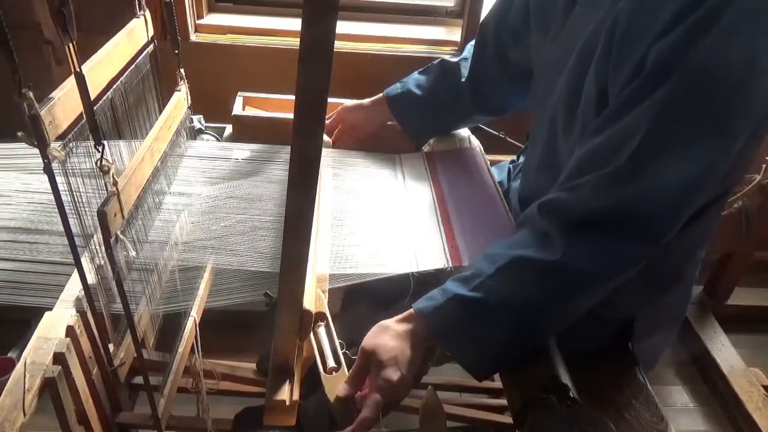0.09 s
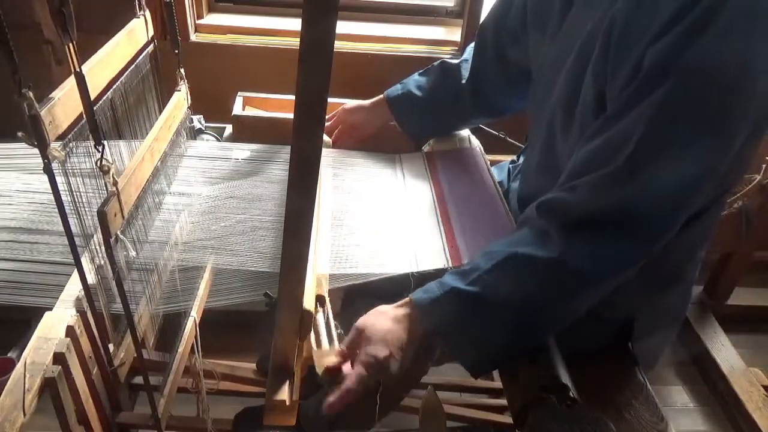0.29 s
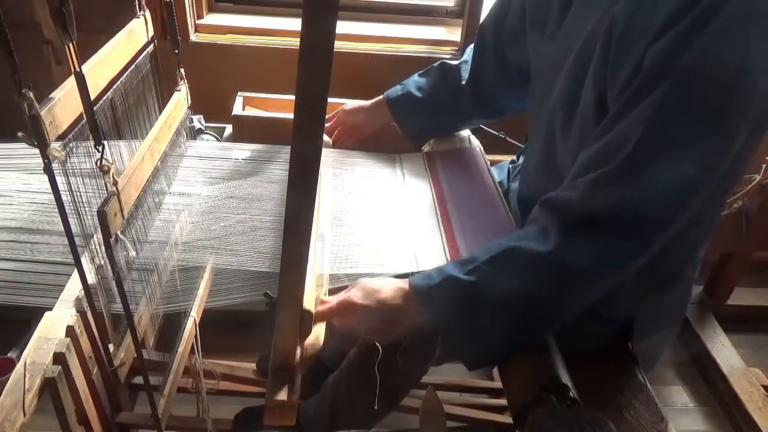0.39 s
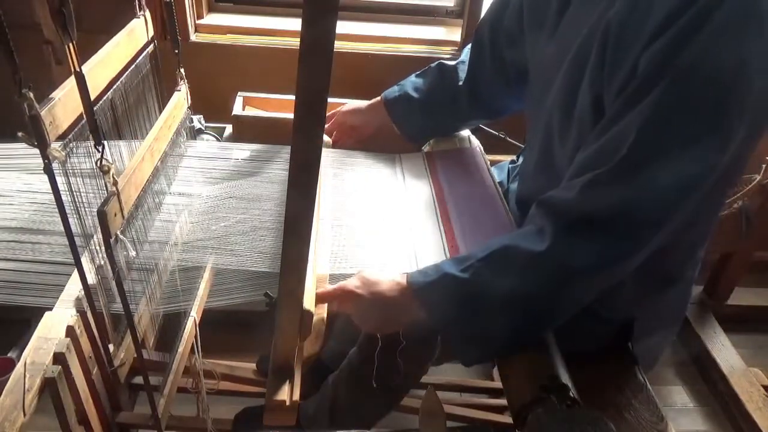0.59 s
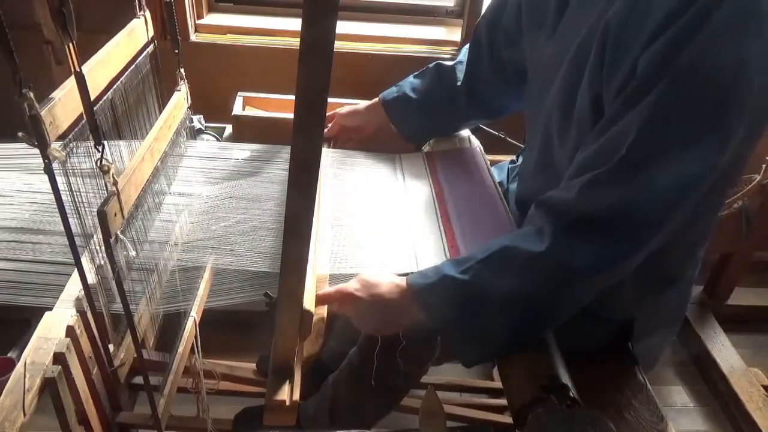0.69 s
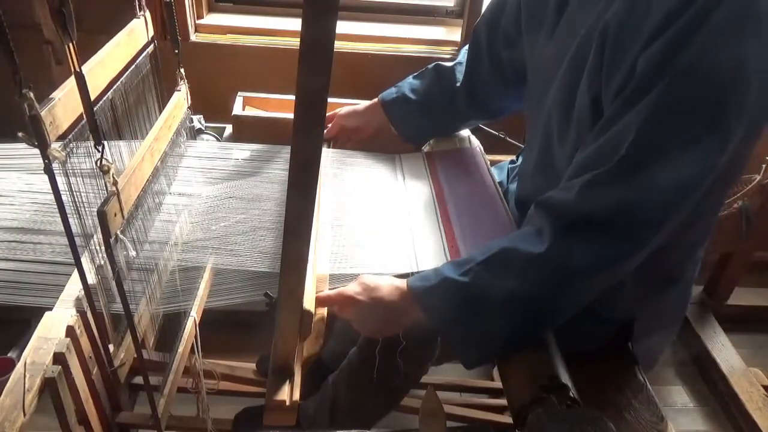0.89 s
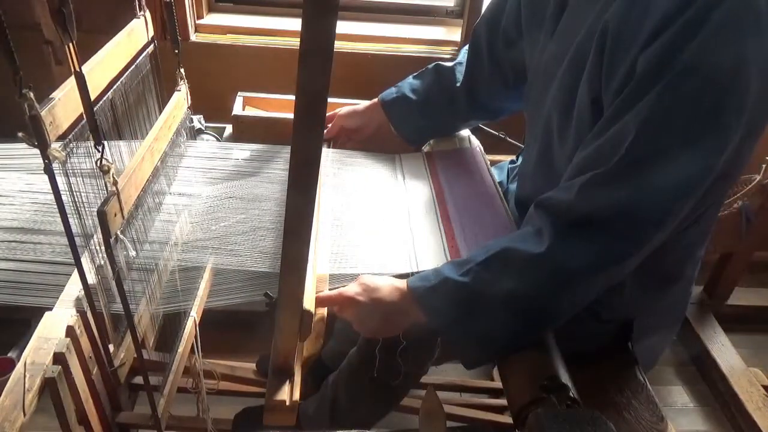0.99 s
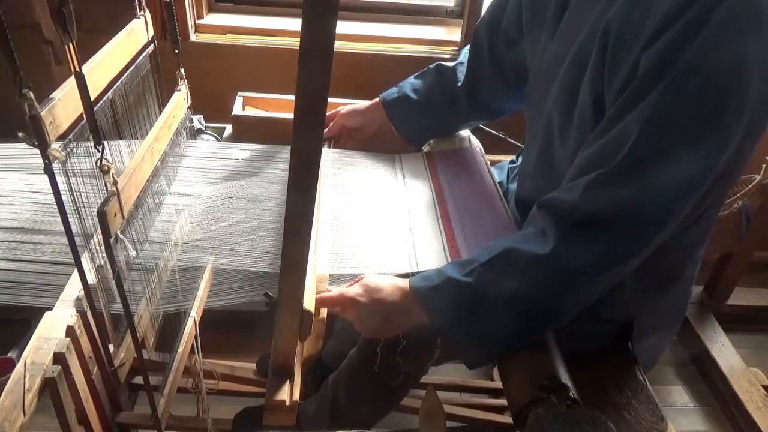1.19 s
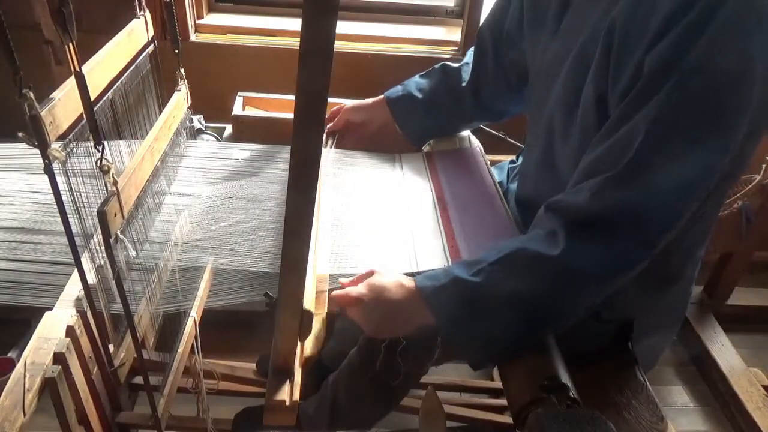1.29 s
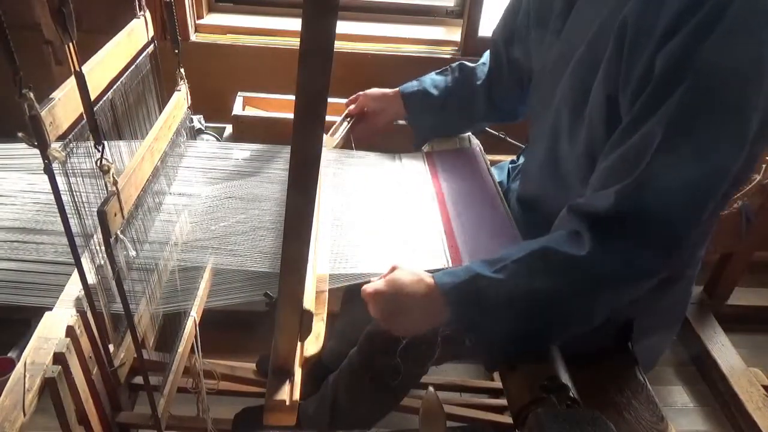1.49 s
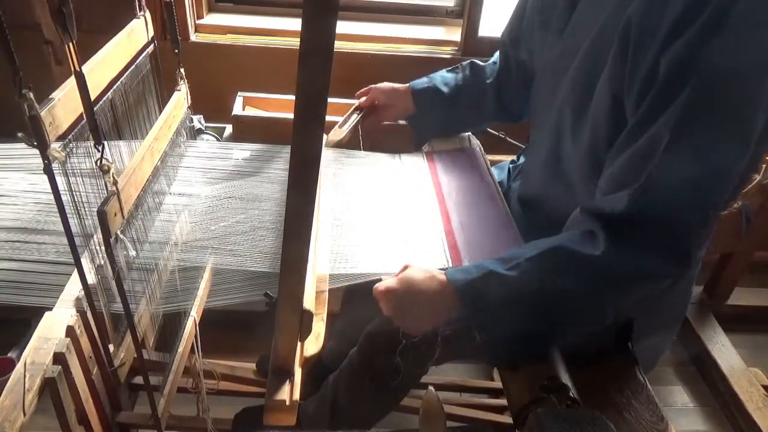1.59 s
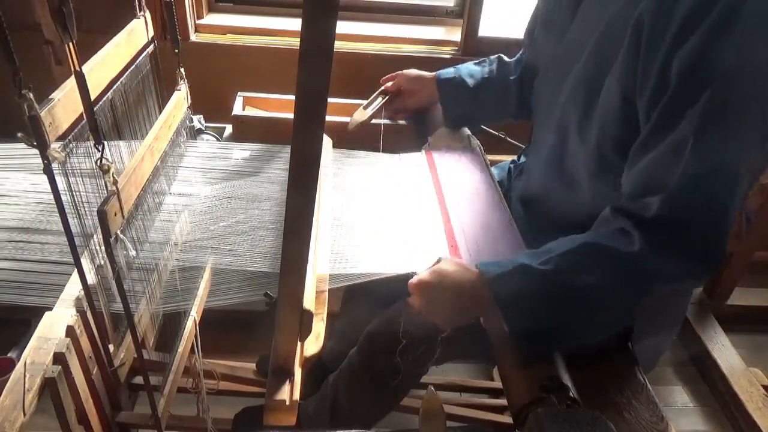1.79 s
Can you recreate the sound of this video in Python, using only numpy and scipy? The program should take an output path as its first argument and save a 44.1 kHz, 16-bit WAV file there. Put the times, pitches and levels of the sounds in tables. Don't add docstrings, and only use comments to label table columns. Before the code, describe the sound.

A wooden handloom changes shed with a bright clattering burst of wire clicks and frame knocks.

```python
import sys
import numpy as np
from scipy import signal
from scipy.fft import rfft, irfft, next_fast_len
from scipy.io import wavfile
from scipy.ndimage import uniform_filter1d, map_coordinates

SR = 44100
rng = np.random.default_rng(int(sys.argv[2]) if len(sys.argv) > 2 else 0)


def elevation(decibels):
    levels = np.asarray(decibels, float)
    return 10 ** (levels / 20)


def unload_audio(sound):
    columns = np.transpose(np.atleast_2d(sound))
    steps = np.round(np.clip(columns, -1, 1) * 32767)
    wavfile.write(sys.argv[1], SR, steps.astype(np.int16))


N = 79380

# f/Hz, density/dB
HEDDLES = [(410, -36), (700, -6), (1050, -5), (1280, -11.5), (2170, -6.5), (2620, -1.5), (5090, -2.5),
           (8030, -5), (11400, -14), (14800, -44), (22000, -120)]
# f/Hz, width/Hz, level/dB
WIRES = [(2960, 53, -2), (3260, 14, -14), (3820, 51, -25), (4660, 210, -6.5), (5740, 57, -2),
         (6620, 270, -10), (7500, 60, -33)]
WIRE_DB = -11.5
# t/s, gain/dB
GAIN = [(0, -1), (.7, -8), (.95, -7.5), (1.1, -4), (1.13, 6.5), (1.6, 5), (1.8, 5)]


def unit(x):
    return x / np.sqrt(np.mean(x ** 2) + 1e-20)


def along(points, hz):
    f, v = np.transpose(points)
    return np.interp(np.log(hz + 1), np.log(f + 1), v)


def curve(rows):
    t, db = np.transpose(rows)
    return np.interp(np.arange(N) / SR, t, db, left=-120, right=-120)


def wobble(rate):
    return map_coordinates(rng.standard_normal(300), [np.arange(N) * rate / SR])


def filtered(x, response):
    m = next_fast_len(N + SR // 2)
    return irfft(rfft(x, m) * response(np.fft.rfftfreq(m, 1 / SR)), m)[..., :N]


def body(peaks, widen=1):
    def response(f):
        total = 0
        for k, (centre, width, db) in enumerate(peaks):
            damping = 1j * f * width * widen
            total = total + (-1) ** k * elevation(db) * damping / (centre * centre - f * f + damping)
        return total
    return response


def taps(rate, spread_db):
    u = rng.random((N, 3))
    struck = u[:, 0] < rate / SR
    return struck * np.sign(u[:, 1] - .5) * elevation(-spread_db * np.log(u[:, 2] + 0.0096))


def impulses(events, db):
    x = np.zeros(N)
    for row in events:
        x[round(row[0] * SR)] = elevation(row[1] + db)
    return x


def rings(events, t60, rise_s):
    out, t = np.zeros(N + SR), np.arange(SR // 8) / SR
    for (s, db, hz), u in zip(events, rng.random((60, 2))):
        partner_hz = hz * (1 + 0.037 * (u[0] - .5))
        pair = np.sin(2 * np.pi * hz * t) + 0.34 * np.sin(2 * np.pi * (partner_hz * t + u[1]))
        out[round(s * SR):][:len(t)] += elevation(db - 60 * t / t60) * (1 - np.exp(-t / rise_s)) * pair
    return out[:N]


def clicks(events, colour, wire_db, t60=0.038):
    focus_db, focus_oct, attack_s = 9.5, 0.33, .0004
    crack_db, crack_t60 = 2, 0.00047
    out, t = np.zeros(N + SR), np.arange(SR // 12) / SR
    for s, db, centre_hz in events:
        u = rng.random((150, 4))
        hz = 600 + 11600 * u[:, :1]
        focus = focus_db * np.exp(-(np.log2(hz / centre_hz) / focus_oct) ** 2)
        level = along(colour, hz) + focus + 9 * u[:, 1:2]
        decay = elevation(level - 60 * t / (t60 * (0.83 + 0.68 * u[:, 2:3])))
        modes = decay * np.sin(2 * np.pi * (hz * t + u[:, 3:]))
        ring = modes.sum(0) * (1 - np.exp(-t / attack_s))
        crack = elevation(crack_db - 60 * t / crack_t60) * rng.standard_normal(len(t))
        click = 0.13 * unit(ring) + .5 * np.diff(crack, prepend=0)
        out[round(s * SR):][:len(t)] += elevation(db - 6) * click
    return out[:N] + filtered(impulses(events, 36 + wire_db), body(WIRES, .7))


def shower():
    # t/s, level/dB
    swell = [(.2, -49), (.23, -48), (.3, -28.5), (.37, -19), (.4, -17.5), (.5, -20.5), (.55, -25.5),
             (.66, -30), (.78, -44.5)]
    rate, spread_db, width_hz = 2700, 0.5, 240
    shine_hz, shine_db, shine_grows = 8000, 4, 0.85
    bank = []
    for hz in np.geomspace(900, 10900, 30):
        bank.append((hz, width_hz * (hz / 4000) ** 0.68, along(HEDDLES, hz)))
    x = np.zeros(N)
    for k in range(10):
        contacts = taps(rate / 10, spread_db) * elevation(1.5 * wobble(35.14))
        x += filtered(contacts, body(bank[k::10]))
    x = unit(x)
    high = filtered(x, lambda f: 1 / (1 + (shine_hz / (f + 1)) ** 6))
    level = curve(swell)
    shine = elevation(shine_db + shine_grows * (level - level.max()))
    return elevation(level) * (x - high + shine * high)


def heddles():
    # t/s, peak/dB, f/Hz
    shed_clicks = [(0.2271, -19.5, 3000), (0.2388, -12, 2680), (0.2438, -9, 3550), (0.2547, -2.5, 4130),
                   (0.2636, 0.5, 6060), (0.269, -10, 4200), (0.2887, -9.5, 6460), (0.3076, -2.5, 2950),
                   (0.3297, -5, 5100), (0.3374, -20, 5280), (0.3541, -1, 5900), (0.372, -16, 5100),
                   (0.3775, -8, 3270), (0.381, -1, 9200), (0.4187, 1, 8150), (0.4323, -3.5, 6400),
                   (0.444, -5, 3580), (0.4616, -0.5, 4730), (0.4872, -1, 5350), (0.496, -6.5, 2920),
                   (0.515, -9, 2970), (0.559, -3, 3630), (0.5816, -5.5, 2910), (0.613, -6.5, 2730),
                   (0.6458, -10, 6350)]
    # t/s, peak/dB, f/Hz
    lone_clicks = [
        (0.0433, -25.5, 4580),
        (1.1238, -31, 4220),
        (1.15, -31.5, 4670),
        (1.187, -29, 2470),
        (1.24, -34, 3000),
        (1.3523, -22, 2960),
        (1.6773, -23, 4930),
    ]
    # t/s, peak/dB, f/Hz
    pings = [(.308, -14, 6900), (.309, -19, 2650), (.355, -14, 5200), (.372, -8, 5000), (.384, -17, 2800),
             (.4195, -13.5, 7850), (.428, -14, 10910), (.43, -29, 5800), (.441, -14, 2800),
             (.463, -16.5, 4500), (.4885, -14, 4850), (.49, -24, 10480), (.493, -10, 7300),
             (.516, -19.5, 3000), (.5825, -15, 5200), (.646, -19.5, 6700)]
    struck = clicks(shed_clicks + lone_clicks, HEDDLES, WIRE_DB)
    return struck + shower() + rings(pings, t60=.05, rise_s=0.0019)


def shuttle_tip():
    # t/s, peak/dB, f/Hz
    bounces = [
        (1.3914, -11, 3130),
        (1.4134, -20, 3240),
        (1.438, -17, 4200),
        (1.4557, -16.5, 3420),
        (1.4852, -22, 3580),
        (1.5098, -24.5, 8000),
    ]
    # f/Hz, density/dB
    tip_colour = [(500, -43), (1200, -22), (1800, -6), (2400, -2), (3200, 0), (5000, -10.5), (6330, -2),
                  (7640, 1.5), (9470, -18.5), (11200, -0.5), (14600, -34), (22000, -120)]
    return clicks(bounces, tip_colour, wire_db=-10, t60=.022)


def bobbin():
    # t/s, level/dB
    chatter_a = [(0.564, -28), (0.585, -32), (0.619, -28), (.645, -35.5), (.7, -47.5), (0.762, -50)]
    chatter_b = [(0.785, -51), (0.796, -38), (0.839, -46), (.865, -62), (0.899, -66), (0.911, -50),
                 (.94, -60), (0.971, -77)]
    chatter_c = [(1.254, -49), (1.262, -45.5), (1.289, -44), (1.339, -45), (1.385, -47)]
    after_rattle = [(1.392, -35), (1.43, -43.5), (1.5, -46.5), (1.58, -72)]
    # f/Hz, width/Hz, level/dB
    bobbin_a = [(530, 50, -11), (1120, 70, -15), (2860, 55, -2), (3090, 55, -2), (3360, 60, -6),
                (4200, 100, -14), (5000, 80, -12), (6700, 90, -15)]
    bobbin_b = [(1620, 40, -9), (1975, 45, 0), (1750, 35, -10), (4270, 75, -7), (3830, 70, -9),
                (6750, 100, -7)]
    bobbin_c = [(1950, 70, -8), (2980, 60, -8), (4010, 70, -5), (4300, 70, -5), (6820, 80, -1)]
    # t/s, peak/dB
    taps_a = [(0.5822, -6), (0.5918, -8), (.5955, -15), (0.6017, -7.5), (.6095, -9), (.6145, -1.5),
              (0.6204, -9.5), (0.628, -7), (.633, -10.5), (.641, -17), (.658, -19), (.672, -20),
              (0.6927, -19), (0.715, -24)]
    taps_b = [(.751, -27), (0.52, -28), (.8017, -24), (.8105, -24.5), (0.83, -26), (0.844, -34),
              (.908, -37.5), (.929, -38), (0.951, -45)]
    taps_c = [(1.2609, -23.5), (1.2755, -25.5), (1.284, -28), (1.295, -25), (1.3297, -28), (1.3581, -26)]
    widening = [2.2, 1.6, 1.7, 2.2]
    chatter_rate, tap_db = 330, 28
    break_db, break_rate = 2.5, 55
    crack_hz, crack_db = 4500, -1
    levels = [chatter_a, chatter_b, chatter_c, after_rattle]
    bodies = [bobbin_a, bobbin_b, bobbin_c, WIRES[:4]]
    out = np.zeros(N)
    for level, peaks, clear, widen in zip(levels, bodies, [taps_a, taps_b, taps_c, []], widening):
        for k in range(3):
            uneven = elevation(curve(level) + break_db * wobble(break_rate))
            chatter = uneven * 12 * unit(taps(chatter_rate, 0.98))
            out += filtered(chatter + impulses(clear, tap_db), body(peaks[k::3], widen))
    hard = [(s, db + crack_db, crack_hz) for s, db in taps_b[:7] + taps_c[:3]]
    return out + clicks(hard, HEDDLES, WIRE_DB)


def wood_struck(rate, spread_db, peaks, low_cut_hz):
    resonances = body(peaks)
    return filtered(taps(rate, spread_db), lambda f: resonances(f) * f / (f - 1j * low_cut_hz))


def frame():
    # t/s, level/dB
    knocking = [(.035, -46), (.05, -46.5), (.12, -61.5), (.19, -53.5), (.25, -38), (.3, -41.5),
                (.345, -27.5), (.45, -33), (.53, -31.5), (.6, -37.5), (.7, -45.5), (.74, -51), (.95, -56.5),
                (1.11, -66.5)]
    # f/Hz, width/Hz, level/dB
    boards = [(343, 103, 1.5), (440, 83, -0.5), (548.5, 57, 5), (780, 110, -2.5), (1073, 105, -2),
              (1460, 110, -5), (1750, 86, 2)]
    # t/s, peak/dB, f/Hz
    knocks = [(.044, -39.5, 483), (.046, -48, 340), (.209, -37, 555), (.255, -36, 1124), (.307, -30, 553),
              (.307, -23, 1347), (.332, -15.5, 1036), (.354, -20, 1059), (.356, -22, 772),
              (.368, -23.5, 465), (.376, -25, 1070), (.436, -25.5, 1058), (.436, -28, 410),
              (.493, -22, 1055), (.51, -19, 1096), (.557, -22, 498), (.581, -23, 529), (.594, -20, 527),
              (.628, -21.5, 1131), (.635, -26, 542), (.669, -24, 1080), (.68, -29, 544), (.685, -29, 1091)]
    # t/s, level/dB
    treadle = [(1.12, -73), (1.17, -55.5), (1.22, -50), (1.26, -49), (1.36, -49.5), (1.4, -78)]
    # f/Hz, width/Hz, level/dB
    treadle_body = [(348, 55, 1.5), (386, 50, 0), (488, 36, 0)]
    # t/s, level/dB
    beam_shake = [(.03, -63), (.06, -54.5), (.18, -56), (.3, -50), (.33, -42), (.42, -43.5), (.5, -48.5),
                  (.6, -49), (.67, -44), (.72, -52), (.76, -64), (1, -67)]
    # f/Hz, width/Hz, level/dB
    beam_body = [(168.4, 21.5, 25), (137, 14, -10)]
    board_sound = unit(sum(wood_struck(160, 2.7, boards[k::2], 250) for k in range(2)))
    beam = unit(wood_struck(150, 0.56, beam_body, 120))
    creak = unit(wood_struck(230, 2.12, treadle_body, 250))
    tread = elevation(curve(treadle))
    knocked = elevation(curve(knocking)) * board_sound + rings(knocks, t60=0.076, rise_s=0.0017)
    return knocked + tread * creak + (elevation(curve(beam_shake)) + tread) * beam


def room(x):
    # f/Hz, t60/s
    room_t60 = [(200, 0.14), (3000, 0.28), (10000, 0.2)]
    # f/Hz, level/dB
    side_colour = [(200, 6), (700, -4), (1400, 0.5), (2800, -9.5), (9000, 4.5)]
    mid_db, side_db = -8, -18.5
    hz, t, z = signal.stft(rng.standard_normal((2, SR // 2)), SR, nperseg=256)
    decay = elevation(-60 * t / along(room_t60, hz)[:, None])
    tail = signal.istft(z * decay, SR, nperseg=256)[1]
    tail = tail / np.linalg.norm(tail[0])
    late = np.pad(x, (200, 0))[None]
    mid, side = signal.fftconvolve(late, tail, axes=1)[:, :N]
    side = filtered(side, lambda f: elevation(along(side_colour, f)))
    return elevation(mid_db) * mid + elevation(side_db) * np.array([side, -side])


def floor():
    # f/Hz, density/dB
    hiss = [(15, -64), (25, -45), (166, -10), (226, -10.5), (398, -12), (514, -17), (555, -15.5),
            (5150, -13.5), (11400, -17), (14800, -17), (22000, -120)]
    hiss_db, side_db = -52, -14
    mid, side = unit(filtered(rng.standard_normal((2, N)), lambda hz: elevation(along(hiss, hz))))
    return elevation(hiss_db + curve(GAIN)) * (mid + elevation(side_db) * np.array([side, -side]))


def hum():
    # f/Hz, rms/dB
    hum_tones = [
        (83, -66.5),
        (166, -61.5),
    ]
    # f/Hz, density/dB
    drone = [(20, -16.5), (90, -14), (130, -9.5), (200, -52)]
    drone_db = -65
    t = np.arange(N) / SR
    drift = np.cumsum(rng.standard_normal(N)) * 0.012
    tones = np.zeros(N)
    for hz, db in hum_tones:
        tones += elevation(db) * np.sqrt(2) * np.sin(2 * np.pi * hz * t + drift * hz / 83)
    mid, side = unit(filtered(rng.standard_normal((2, N)), lambda hz: elevation(along(drone, hz))))
    return tones + elevation(drone_db) * (mid + 0.23 * np.array([side, -side]))


def scene():
    wires = heddles() + shuttle_tip()
    loom = filtered(wires, lambda f: (f / (f - 500j)) ** 2) + bobbin()
    wood = frame()
    direct = loom * elevation([[.2], [-.2]]) + wood * elevation([[.9], [-.9]])
    background = floor() + hum() * elevation(0.1 * curve(GAIN))
    return direct + room(loom + wood) + background


def roll_off(x):
    return signal.sosfilt(signal.butter(12, 12370, fs=SR, output="sos"), x)


def record(dry):
    ceiling, edge_hz, top_hz = .64, 11030, 11400
    shelf_db, over_db, opens_db = -21, -37.5, -36
    x = dry / (1 + np.abs(dry / ceiling) ** 6) ** (1 / 6)

    def shelf(hz):
        slope_db = over_db - (hz - top_hz) / 40
        return (hz >= edge_hz) * elevation(np.where(hz < top_hz, shelf_db, slope_db))

    power = np.abs(uniform_filter1d(x.mean(0) ** 2, size=1024))
    opening = power ** 2 / (power ** 2 + elevation(opens_db) ** 4)
    mix = filtered(x, lambda hz: hz < edge_hz) + filtered(x, shelf) * opening
    return roll_off(mix)


dry = scene()
out = record(dry)
unload_audio(out)
```